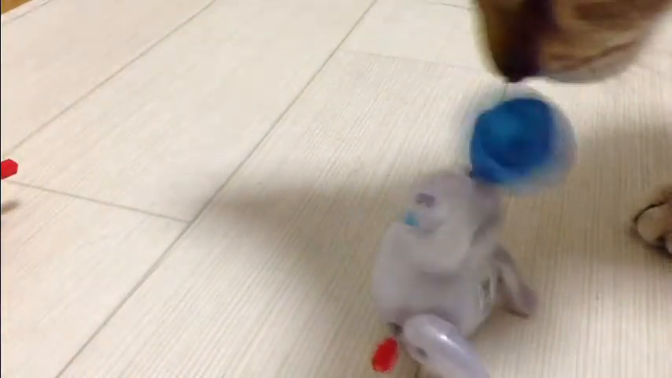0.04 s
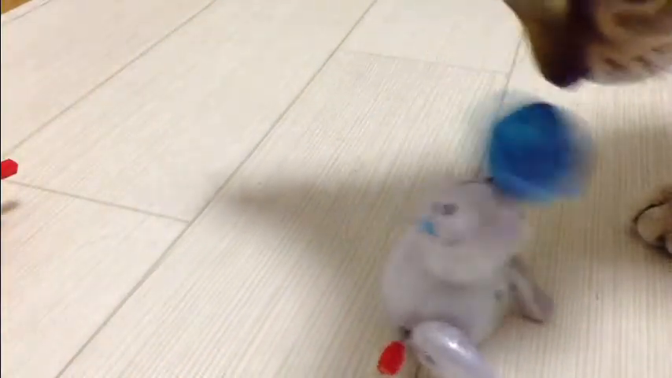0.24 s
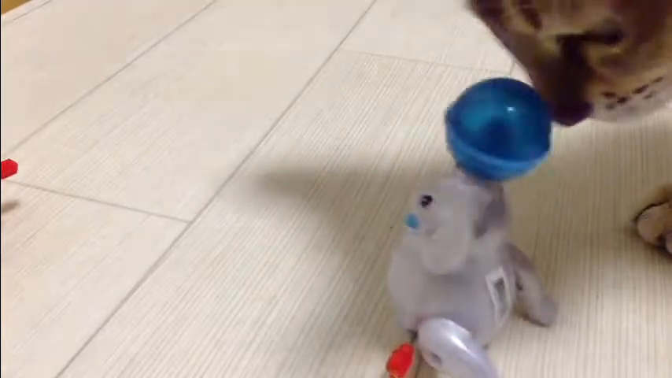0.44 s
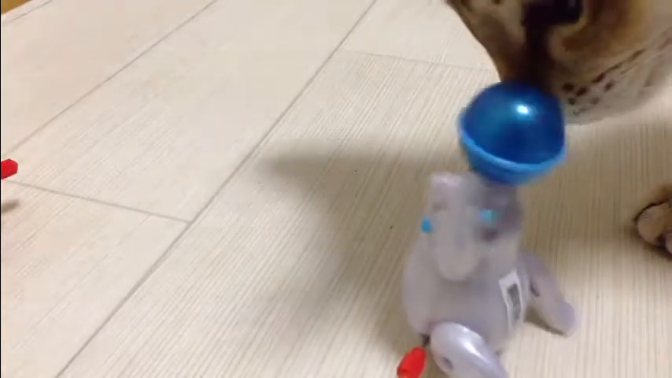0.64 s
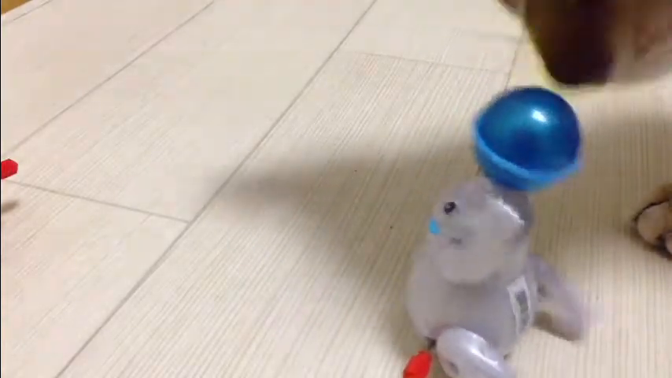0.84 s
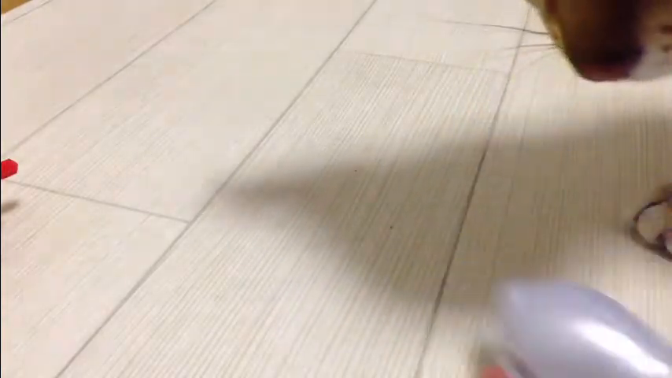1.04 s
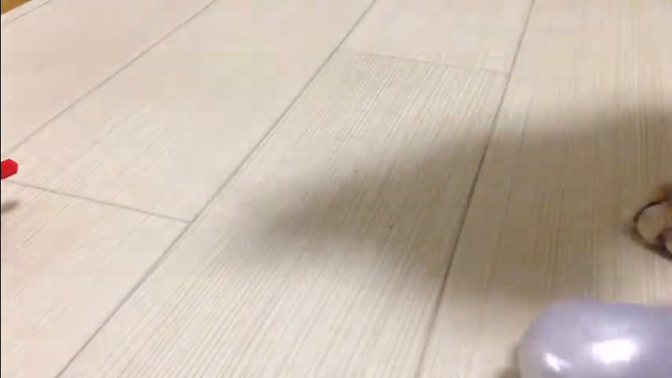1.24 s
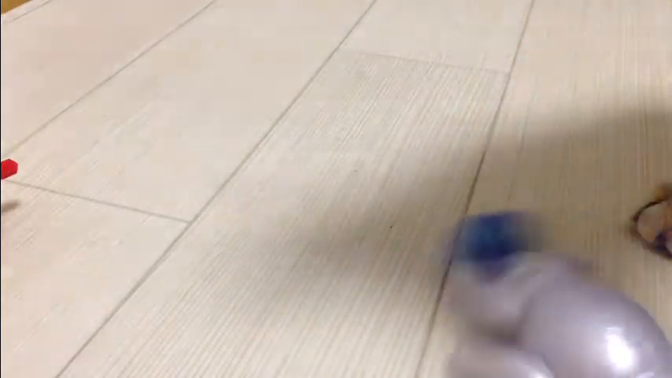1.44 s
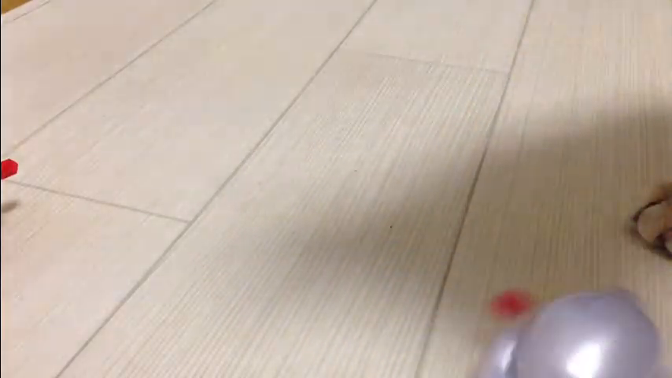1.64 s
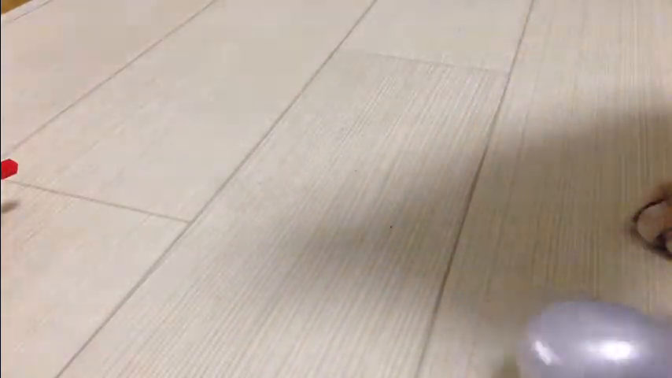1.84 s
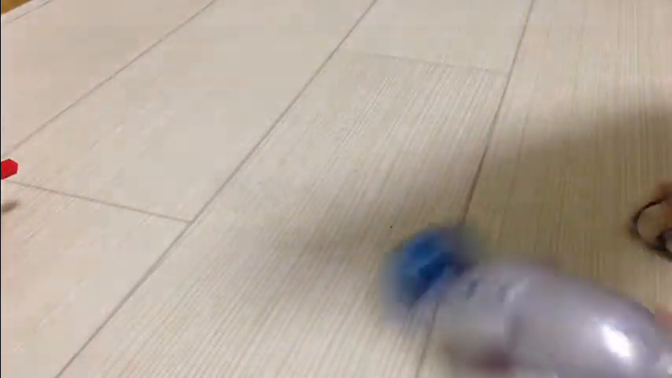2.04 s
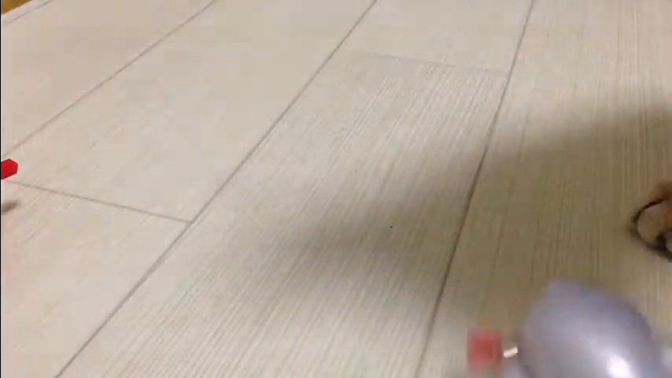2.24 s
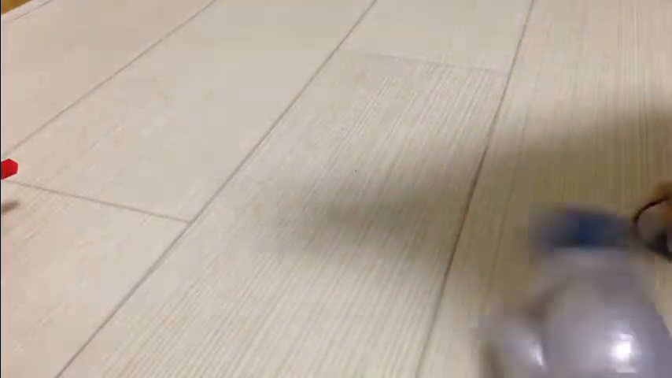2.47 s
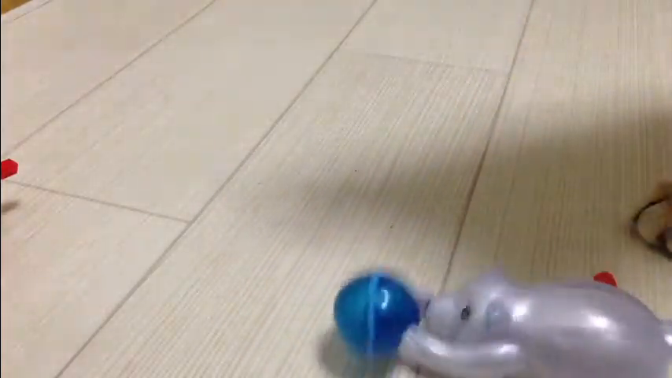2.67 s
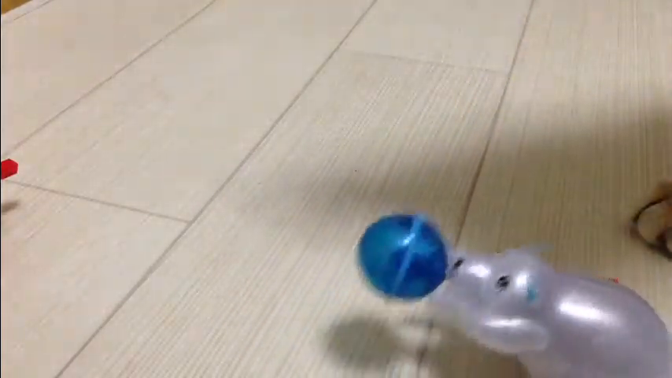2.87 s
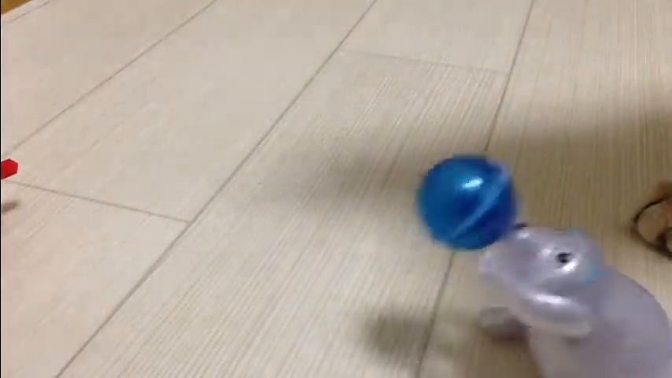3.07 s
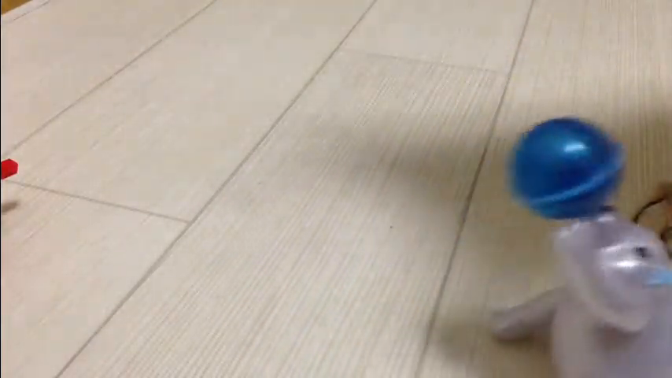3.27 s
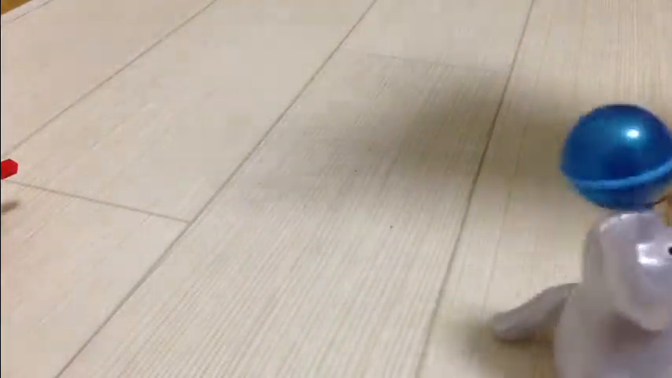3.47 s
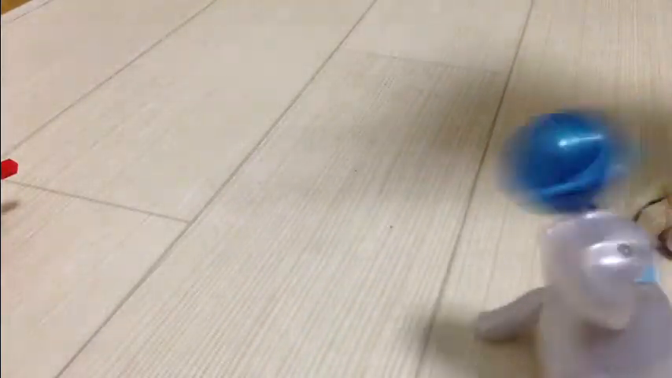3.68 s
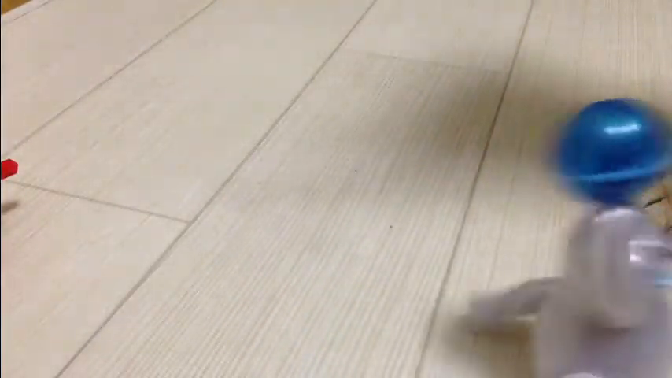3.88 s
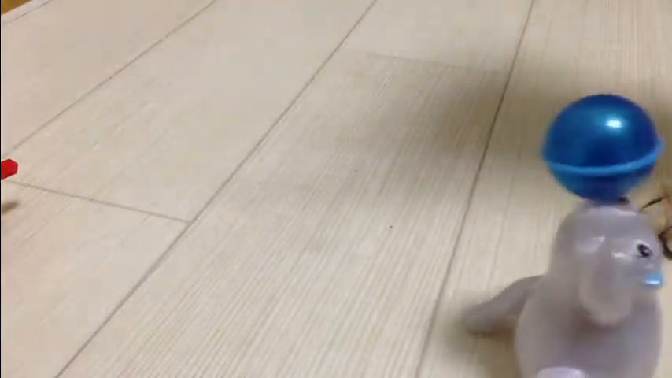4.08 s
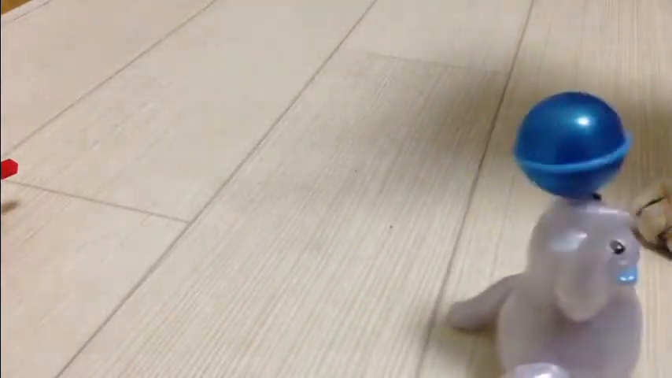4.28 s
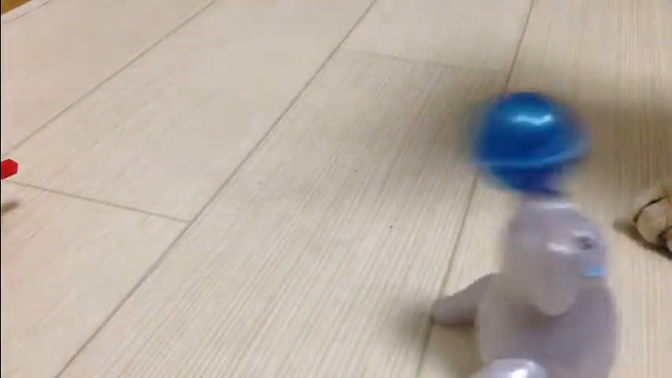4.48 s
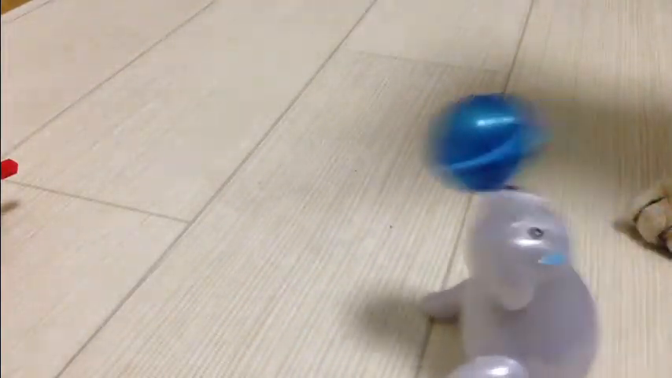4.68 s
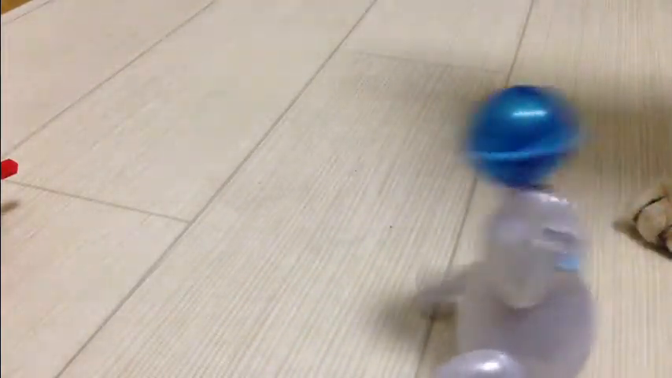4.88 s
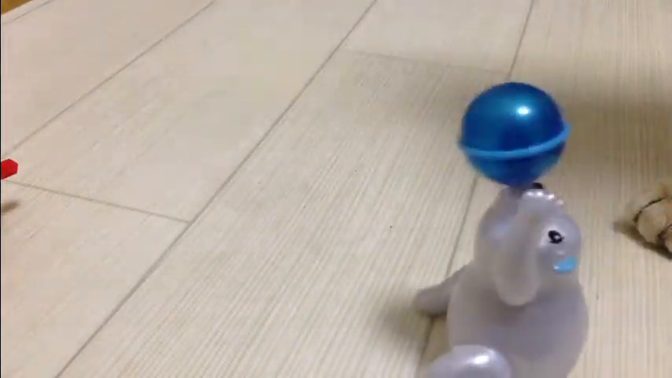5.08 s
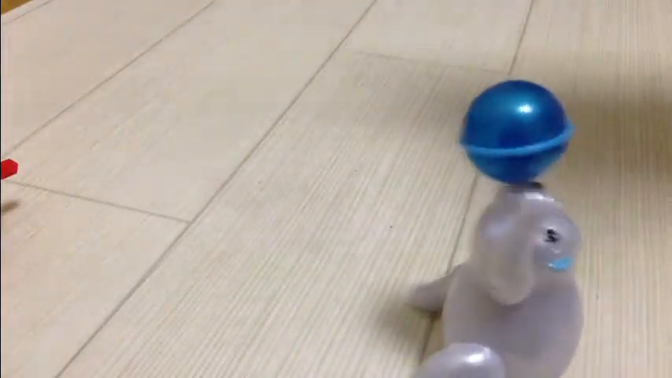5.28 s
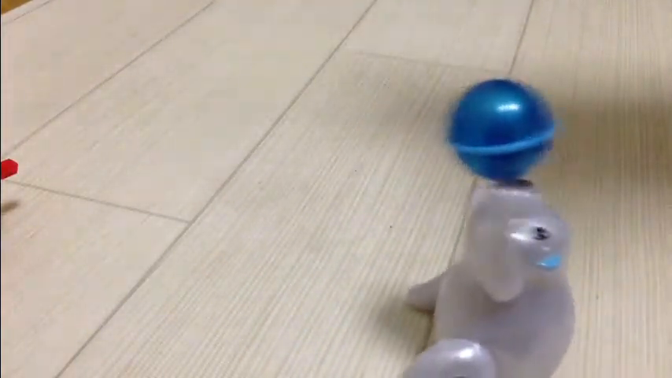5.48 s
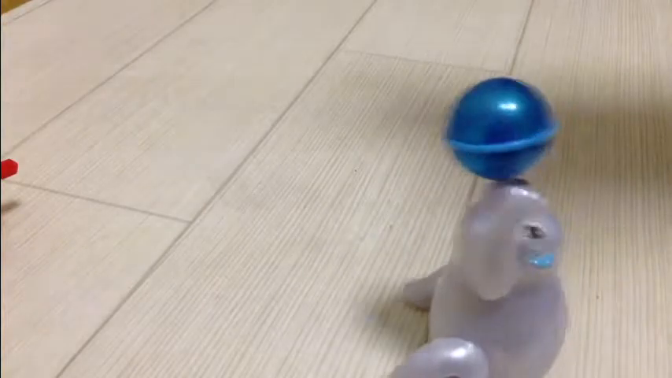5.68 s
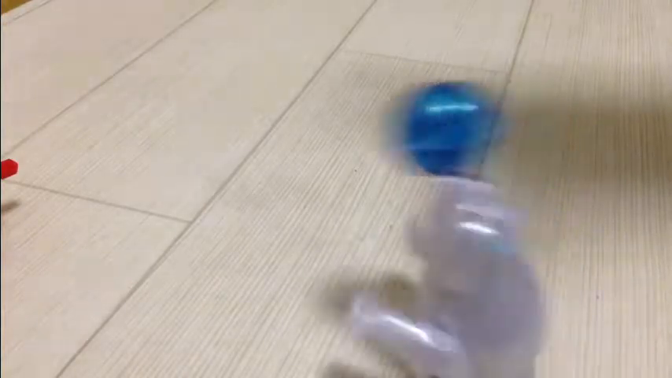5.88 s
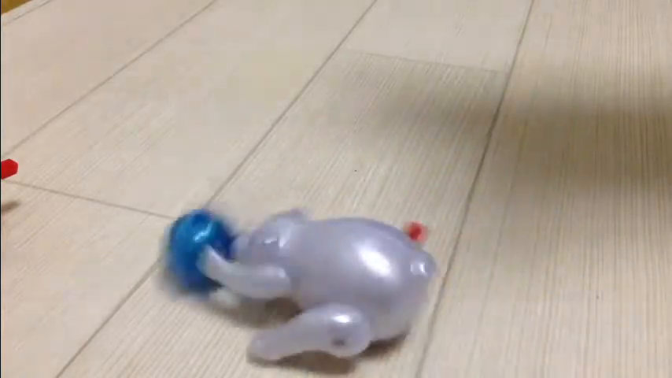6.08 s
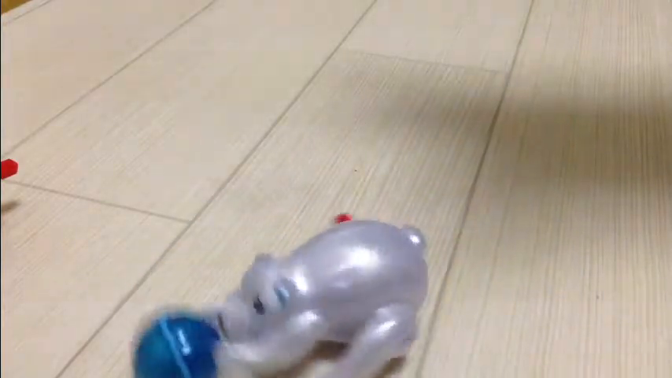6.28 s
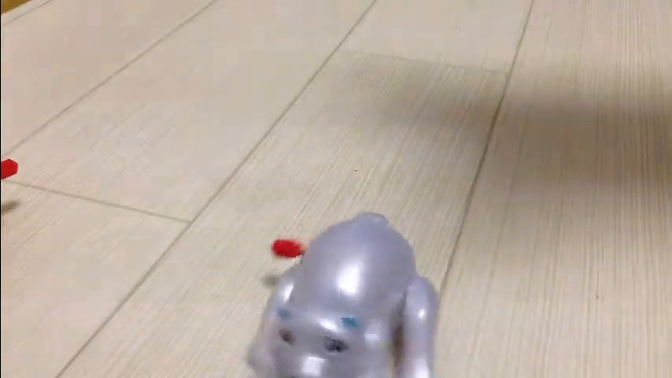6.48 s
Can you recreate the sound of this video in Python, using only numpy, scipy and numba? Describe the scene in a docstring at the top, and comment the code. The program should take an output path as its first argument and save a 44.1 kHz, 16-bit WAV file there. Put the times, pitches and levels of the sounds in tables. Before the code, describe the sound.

Close, buzzing clockwork of a small plastic toy, with light taps and clicks on floorboards and two clattering falls.

```python
"""A chattering whir: a plastic wind-up seal, ball on its nose, crosses a hard floor in a small room.
Gear teeth ring its hollow shell and body; feet tap the boards and joints click over their cams.
It topples, nearly stalls, thrashes on its side, rights itself, shuffles on and falls again,
leaving the clockwork ticking slowly. Close, mono."""
import sys
import numpy as np
from scipy import signal
from scipy.fft import rfft, irfft, next_fast_len
from scipy.io import wavfile
from scipy.ndimage import uniform_filter1d, minimum_filter1d
from numba import njit

SR = 44100
rng = np.random.default_rng(int(sys.argv[2]) if len(sys.argv) > 2 else 0)


def wrap_up_sound(samples):
    """Save the sound to the file named by the first command line argument, as 16-bit audio."""
    columns = np.atleast_2d(samples).T
    # keep every value between -1 and 1, then stretch to whole-number steps
    tamed = np.clip(columns, -1, 1)
    steps = np.round(tamed * 32767).astype(np.int16)
    wavfile.write(sys.argv[1], SR, steps)


N = 287532
TIME = np.arange(N) / SR
TOP_HZ = 15350


def undb(db):
    """dB to gain."""
    return 10 ** (np.asarray(db) / 20)


def unit(x):
    """Scale to rms 1."""
    return x / np.sqrt(np.mean(x ** 2))


def wander(rate_hz):
    """Random values joined by lines, rms 1."""
    return unit(np.interp(TIME * rate_hz, np.arange(8192), rng.standard_normal(8192)))


def add(out, start_s, sound):
    """Mix sound into out."""
    start = max(int(start_s * SR), 0)
    out[start:start + len(sound)] += sound[:N - start]


def lowpass(x, cutoff_hz):
    """Smooth zero-phase low-pass."""
    size = next_fast_len(len(x) + 1024)
    hz = np.fft.rfftfreq(size, 1 / SR)
    return irfft(rfft(x, size) / (1 + (hz / cutoff_hz) ** 6), size)[:len(x)]


def ring(x, spectrum, size=2048):
    """Minimum-phase resonator of unit energy; spectrum (f/Hz, level/dB) sets its shape only."""
    hz, db = np.transpose(sorted(spectrum))
    grid_hz = np.maximum(np.fft.rfftfreq(size, 1 / SR), 1)
    magnitude = undb(np.interp(np.log(grid_hz), np.log(hz), db))
    cepstrum = irfft(np.log(magnitude))
    cepstrum[1:size // 2] *= 2
    cepstrum[size // 2 + 1:] = 0
    response = irfft(np.exp(rfft(cepstrum)))
    return signal.fftconvolve(x, response / np.linalg.norm(response))[:len(x)]


@njit
def resonate(x, hz, width_hz):
    """State-variable band-pass, gain 1 at its moving centre."""
    out, band_state, low_state = np.empty(len(x)), 0., 0.
    for i in range(len(x)):
        g, damping = np.tan(np.pi * hz[i] / SR), width_hz / hz[i]
        passed = (band_state + g * (x[i] - low_state)) / (1 + g * (g + damping))
        band_state = 2 * passed - band_state
        low_state += 2 * g * passed
        out[i] = damping * passed
    return out


def band(x, hz, width_hz):
    """Two band-passes in series, rms 1."""
    centre_hz, width_hz = hz * np.ones(len(x)), float(width_hz)
    return unit(resonate(resonate(x, centre_hz, width_hz), centre_hz, width_hz))


# Background spectrum: f/Hz, level/dB
AIR_SPECTRUM = [(20, -63), (45, -30), (80, -11.5), (160, 1), (300, -3.5), (700, -0.5), (2000, -9.5),
                (15000, -15)]
def room_tone():
    """Faint, low hush of the room."""
    return undb(-77) * ring(rng.standard_normal(N), AIR_SPECTRUM)


def room(x, t60_s, wet_db, damp_hz):
    """Direct sound plus duller, diffuse wall reflections."""
    t = TIME[:SR // 2]
    tail = lowpass(rng.standard_normal(len(t)), damp_hz)
    tail *= np.exp(-np.log(1000) * t / t60_s) * (1 - np.exp(-t / 0.00099))
    return x + undb(wet_db) * signal.fftconvolve(x, tail / np.linalg.norm(tail))[:N]


def stray(hz, share=.012, rate_hz=12):
    """A mode's pitch shifts as the floor contact moves."""
    return hz * (1 + share * wander(rate_hz))


def swell(depth_db=3, rate_hz=24):
    """A mode's gain comes and goes as the toy wobbles, rms 1."""
    return unit(undb(depth_db * wander(rate_hz)))


# Body cavity modes: f/Hz, width/Hz, level/dB
HOLLOW_MODES = [(637, 45, -11), (1175, 79, -9.5), (1356, 31, -7), (2250, 59, 2.5)]
def hollow(force):
    """Narrow rings of the hollow body."""
    force = force + 1e-18  # avoids denormals
    return sum(undb(db) * swell() * resonate(force, stray(hz), float(width_hz))
               for hz, width_hz, db in HOLLOW_MODES)


def blow(clatter_s, clatter_db, rattle_s, rattle_db, size=4000):
    """One contact of unit energy: sharp push, quick rebounds, loose parts rattling out."""
    t = TIME[:size]
    rebounds, rattle = rng.standard_normal((2, size))
    force = undb(clatter_db) * rebounds * np.exp(-t / clatter_s)
    force += undb(rattle_db) * rattle * np.exp(-t / rattle_s)
    force[0] += 1
    return force / np.linalg.norm(force)


# Joint clicks: t/s, relative level/dB
JOINT_SNAPS = [(0.33, -20), (0.4785, -15.5), (3.231, -22.5), (4.6745, -19), (5.045, -18.5), (5.096, -13.5),
               (5.18, -18.5), (5.2895, -22), (5.5115, -19.5), (5.564, -17.5), (5.608, -31), (5.7731, -18.5),
               (6.247, -39), (6.272, -37)]
# Joint response: f/Hz, level/dB
JOINT_SPECTRUM = [(200, -44), (900, -14.5), (1400, -10.5), (2300, -10), (3200, -7), (5000, 2.5),
                  (6300, 4.5), (7800, -5.5), (11000, 2), (15000, -9)]
def snaps():
    """Limb joints slip over their cams with a small bright click."""
    out = np.zeros(N)
    for start_s, db in JOINT_SNAPS:
        force = blow(clatter_s=.0024, clatter_db=-3, rattle_s=.0067, rattle_db=-22)
        add(out, start_s, undb(db + 11.5) * ring(force, JOINT_SPECTRUM))
    return out


# Struck plastic: f/Hz, level/dB
PLASTIC_SPECTRUM = [(60, -83), (250, -43), (500, -29), (900, -16.5), (1350, -6.5), (1800, -7), (2500, -1),
                    (3500, -4), (5200, 1.5), (6300, 6), (7700, -3.5), (9000, -0.5), (11500, -2),
                    (15000, -7.5)]
def plastic(force):
    """Bright clack of plastic on the floor."""
    return ring(force, PLASTIC_SPECTRUM)


# Feet and limbs landing: t/s, relative level/dB, hard edge/dB, clatter/dB
FOOTFALLS = [(0.098, -17.5, -20, -30), (0.113, -26, -10, -24), (0.171, -25.5, -10, -16),
             (0.296, -21.5, -14, -24), (0.313, -20.5, -12, -26), (0.479, -23, -17, -16),
             (0.570, -23.5, -8, -31), (0.579, -24, -8, -27), (0.677, -23, -14, -20), (0.866, -19, -23, -35),
             (1.099, -14, -14, -28), (1.146, -14, -20, -33), (1.333, -35.5, -4, -14), (3.758, -23, -8, -11),
             (3.85, -27, -16, -22), (3.982, -29, -3, -19), (4.010, -22.5, -9, -11), (4.025, -25, -1, -16),
             (4.097, -23, -2, -9), (4.235, -23.5, -8, -14), (4.486, -27, -10, -20),
             (4.503, -23.5, -10, -18), (4.757, -22.5, -16, -21), (4.983, -26, -11, -10),
             (5.002, -25, -9, -24), (5.02, -27, -9, -16), (5.2596, -20.5, -14, -30), (5.4043, -19, -2, -25),
             (5.532, -18.5, -2, -26), (5.6647, -19.5, 1, -21), (5.797, -20, 1, -21),
             (6.079, -17.5, -18, -21), (6.475, -43.5, -14, -10)]
# Foot on wood: f/Hz, level/dB
FOOT_SPECTRUM = [(30, -72), (100, -38), (250, -21.5), (450, -13.5), (620, -2.5), (1300, 2), (2200, 10),
                 (3200, 7.5), (5000, 4.5), (15000, -62)]
def steps():
    """Feet rock down on the boards: woody tap, plastic edge, hollow ring."""
    taps, edges = np.zeros((2, N))
    for start_s, db, edge_db, clatter_db in FOOTFALLS:
        force = undb(db + 11.5) * blow(.0025, clatter_db, rattle_s=.009, rattle_db=-26.5)
        add(taps, start_s, force)
        add(edges, start_s, undb(edge_db) * force)
    return ring(taps, FOOT_SPECTRUM) + plastic(edges) + undb(-9) * hollow(taps)


# Shell and ball landing: t/s, relative level/dB, clatter decay/s, thump/dB
IMPACTS = [(1.102, -13.5, 0.0011, -70.5), (1.1441, -9.5, 0.0018, -25), (1.1464, -10, 0.0017, -35),
           (1.197, -24.5, 0.015, -52), (1.219, -33, 0.0022, -54), (6.079, -12, 0.0012, -66),
           (6.1185, -8.5, 0.0015, -24.5), (6.1225, -18, 0.0024, -44), (6.139, -23, 0.001, -52),
           (6.145, -25, 0.00079, -52), (6.182, -26.5, 0.0025, -25), (6.1847, -22, 0.0075, -49),
           (6.194, -28, 0.0014, -56)]
# Floorboard response: f/Hz, level/dB
BOARD_SPECTRUM = [(15, -12), (60, -5), (150, -4.5), (220, 0), (350, -2), (520, 2), (900, -5), (3000, -22.5)]
def falls():
    """The toy topples and bounces: the shell clacks and rings, the weight thumps the boards."""
    clacks, thumps = np.zeros((2, N))
    for start_s, db, clatter_s, thump_db in IMPACTS:
        gain = undb(db + 16) * np.sqrt(clatter_s / .0016)  # longer clatter, more energy
        clack = blow(clatter_s, clatter_db=1, rattle_s=.01, rattle_db=-23)
        thump = blow(clatter_s=.0014, clatter_db=-50, rattle_s=.008, rattle_db=-37)
        add(clacks, start_s, gain * clack)
        add(thumps, start_s, gain * undb(thump_db) * thump)
    return plastic(clacks) + undb(-5.5) * hollow(clacks) + undb(-1.5) * ring(thumps, BOARD_SPECTRUM)


# Orientation: t/s, side heard, relative level/dB, tooth sharpness/dB, body contact/dB
ORIENTATIONS = [(0, "back", -0.8, 3.5, -9), (1.229, "face down", -2, 2, -12.5),
                (1.51, "flank", -2.5, 2.5, -10.5), (2.681, "lying", -2, 2, -12),
                (3.36, "front", -0.48, 2.5, -11), (5.08, "half front", -1.83, 3.5, -10.5),
                (6.15, "face down", 0.6, 2, -12)]
def posture():
    """Held poses with 50 ms crossfades: each side's share, and the three dB curves."""
    current = np.searchsorted([pose[0] for pose in ORIENTATIONS[1:]], TIME)
    facing, tone_db = {}, 0
    for k, (_, side, *pose_db) in enumerate(ORIENTATIONS):
        share = uniform_filter1d(1. * (current == k), SR // 20)
        facing[side] = facing.get(side, 0) + share
        tone_db = tone_db + np.outer(pose_db, share)
    return facing, tone_db


def rocking(flank, period_s=.542, head_up_s=1.486):
    """Swing on the flank: head height and nearness to a turning point, each -1 to 1."""
    angle = 2 * np.pi * (TIME - head_up_s) / period_s
    return flank * np.cos(angle), flank * np.cos(2 * angle)


# Limb strokes: t/s, swell/dB, slack/dB
STROKES = [(0.095, 4.5, 1.5), (0.289, 1.68, 2.5), (0.471, 0.47, 2.05), (0.575, 2.5, 2.5), (0.768, 1.3, 1),
           (1.131, 4, 2), (1.547, 1, 1.5), (1.9, 2, 0.5), (2.229, 1, 0.5), (2.428, 1.5, 2), (2.87, 2, 0.5),
           (2.96, 2, 1), (3.088, 1.84, 10.5), (3.21, 1, 1.5), (3.479, 3, 1.5), (3.765, 3, 1.5),
           (4.013, 3.5, 0.5), (4.245, 5, 2), (4.439, 3, 0), (4.512, 1, 4.5), (4.776, 2.5, 3.5),
           (5.005, 3.5, 4), (5.26, 0, 2), (5.411, 1.3, 1), (5.665, 2, 2), (5.8, 1, 2.5), (6.086, 2, 10),
           (6.5, -2, 1)]
def strides(bear_down_s=.12, release_s=.072, recover_s=.035):
    """Gear load in dB: each stroke bears down, goes slack as the weight tips over, then recovers."""
    shape_s = np.array([-bear_down_s, 0, release_s, release_s + recover_s])
    return sum(np.interp(TIME, at_s + shape_s, [0, swell_db, -slack_db, 0])
               for at_s, swell_db, slack_db in STROKES)


def grit(spread_db=.5):
    """Tiny uneven collisions of dry plastic, rms 1."""
    return unit(rng.standard_normal(N) * undb(spread_db * rng.standard_normal(N)))


# Body and boards, by pose: f/Hz, level/dB
BODY_UPRIGHT = [(120, -65.5), (200, -34), (274, -63.5), (500, -36), (610, -11.5), (740, -14.5),
                (1170, -3.5), (1340, -3), (1640, -4), (2250, 4.5), (2660, -1.5), (2900, -3), (3600, -6.5),
                (4680, -28), (7920, -120)]
BODY_ON_FLANK = [(180, -58), (300, -41), (450, -27), (560, -28), (634, -21), (718, -25.5), (992, -12),
                 (1150, -6.5), (1780, -6), (2430, -0.5), (3140, -6.5), (3600, -4), (4680, -32),
                 (7920, -120)]
BODY_LYING_DOWN = [(240, -62), (400, -37), (650, -30), (850, -19.5), (1100, -11), (1530, -9), (1790, -6),
                   (2470, -3.5), (3020, -9), (3600, -8), (4680, -36), (7920, -120)]
BODY_FACE_DOWN = [(300, -58), (700, -28), (1000, -15.5), (1450, -6), (1700, -11), (2050, -7), (2400, -3.5),
                  (2700, -6), (3000, -10), (3700, -9), (4680, -29), (7920, -120)]
def body_chatter(force, facing, standing):
    """The body chatters loosely on the floor and rings most freely when upright."""
    knocks = force * grit() * undb(1.5 * wander(120))
    upright = ring(knocks, BODY_UPRIGHT) + undb(-11) * unit(hollow(knocks))
    return (standing * upright
            + facing["flank"] * ring(knocks, BODY_ON_FLANK)
            + facing["lying"] * ring(knocks, BODY_LYING_DOWN)
            + facing["face down"] * ring(knocks, BODY_FACE_DOWN))


# Shell rubbing the floor: t/s, length/s, f/Hz, width/Hz, relative level/dB
SHELL_SKIDS = [(1.065, 0.092, 6600, 900, 2.5), (1.377, 0.11, 11800, 1000, -1),
               (1.734, 0.12, 5170, 850, -1.5), (1.788, 0.13, 680, 329.6, -25.5),
               (1.95, 0.2, 4900, 1000, -10), (2.15, 0.12, 560, 397, -33), (2.2, 0.063, 6940, 1200, -7),
               (2.27, 0.12, 5300, 1000, -4), (2.34, 0.12, 610, 400, -28.5), (2.37, 0.075, 6740, 1500, -3),
               (2.51, 0.089, 11800, 1300, -1), (2.655, 0.06, 619, 500, -26), (4.09, 0.12, 6050, 350, -6),
               (4.254, 0.041, 7140, 500, -7), (5.959, 0.071, 10060, 1094, 0), (6.075, 0.044, 6400, 910, 2),
               (6.4, 0.15, 5400, 650, -1.5)]
def skids(buzz):
    """The buzzing shell sings briefly where its edge slides on the floor."""
    out = np.zeros(N)
    for start_s, length_s, hz, width_hz, db in SHELL_SKIDS:
        part = buzz[int(start_s * SR):int((start_s + length_s) * SR)]
        fade = signal.windows.tukey(len(part), .4)
        add(out, start_s, undb(db) * band(part, hz, width_hz) * fade)
    return out


# Shell modes: side, f/Hz, width/Hz, relative level/dB, head-up gain/dB, turning-point gain/dB
SIDE_MODES = [("back", 5870, 620, -10, 0, 0), ("back", 9030, 300, -14.5, 0, 0),
              ("back", 10200, 300, -19, 0, 0), ("back", 12310, 500, -18, 0, 0),
              ("flank", 5050, 750, -8, -1.2, 1.5), ("flank", 6930, 1000, -9, -3, 0),
              ("flank", 11600, 780, -12, 1, 1), ("lying", 7050, 600, -9, 0, 0),
              ("lying", 4950, 350, -13, 0, 0), ("front", 625, 65, -33, 0, 0),
              ("front", 5340, 220, -13.5, 0, 0), ("front", 6040, 300, -9.5, 0, 0),
              ("front", 11360, 450, -14, 0, 0), ("half front", 5330, 350, -8.5, 0, 0),
              ("half front", 11480, 590, -7.5, 0, 0), ("face down", 4950, 600, -8, 0, 0),
              ("face down", 9900, 500, -11, 0, 0)]
def shell_rings(buzz, facing):
    """Single modes stand out while their side faces the listener, and trade places as the toy rocks."""
    head, turning = rocking(facing["flank"])
    out = np.zeros(N)
    for side, hz, width_hz, db, head_db, turn_db in SIDE_MODES:
        gain = facing[side] * swell() * undb(db + head_db * head + turn_db * turning)
        out += gain * band(buzz, stray(hz), width_hz)
    return out


def linger(x, mean_s=.0011, step_hz=130):
    """Strikes bounce inside the shell: each frequency leaves after its own short delay."""
    size = next_fast_len(len(x) + 2048)
    hz = np.fft.rfftfreq(size, 1 / SR)
    delay_s = mean_s * np.interp(hz / step_hz, np.arange(256), rng.exponential(size=256))
    lag_cycles = np.cumsum(delay_s) * SR / size
    return irfft(rfft(x, size) * np.exp(-2j * np.pi * lag_cycles), size)[:len(x)]


# Shell response, by side heard: f/Hz, level/dB
BACK_SPECTRUM = [(1760, -47), (3000, -16), (3250, -9.5), (3530, -7.5), (4990, -2.5), (5800, -0.5),
                 (6820, -4), (7810, -3.5), (8890, -2), (9510, -4.5), (10000, -0.5), (10800, -2.5),
                 (12300, 0.5), (13800, -3.5), (15200, -7.5)]
FRONT_SPECTRUM = [(1760, -39.5), (3000, -19), (3390, -17.5), (3910, -4), (4240, -5), (4960, 2.5),
                  (5490, -0.5), (5960, 3.5), (6590, -2), (7870, -2.5), (9070, -2.5), (11400, 2),
                  (13500, -2.5), (14700, -6), (15200, -4.5)]
FLANK_SPECTRUM = [(1760, -38.5), (3000, -23), (3150, -15.5), (3940, -2.5), (4400, -1), (5270, 0),
                  (5920, -1.5), (6870, -0.5), (8360, -2.5), (10300, -2.5), (11200, 1), (11900, 0.5),
                  (15200, -8)]
LYING_SPECTRUM = [(1760, -44), (3000, -50), (3120, -33), (3750, -3.5), (4100, -2), (4990, 0), (6120, -1.5),
                  (7110, 3), (8310, -5), (8890, -4.5), (9390, -4.5), (10300, -0.5), (11900, 0),
                  (13500, -3.5), (15200, -10.5)]
FACE_DOWN_SPECTRUM = [(1760, -49), (3100, -14), (4000, -8.5), (4400, -2), (5200, -2.5), (6000, -5),
                      (7300, -3), (8700, -4.5), (10800, -3.5), (11800, -0.5), (12600, -5), (15200, -7.5)]
def shell_whir(force, facing, sharp_db):
    """Teeth ring the shell directly; sharper contacts lift the treble."""
    strikes = linger(force * grit(spread_db=.3))
    shell = (facing["back"] * ring(strikes, BACK_SPECTRUM)
             + (facing["front"] + facing["half front"]) * ring(strikes, FRONT_SPECTRUM)
             + facing["flank"] * ring(strikes, FLANK_SPECTRUM)
             + facing["lying"] * ring(strikes, LYING_SPECTRUM)
             + facing["face down"] * ring(strikes, FACE_DOWN_SPECTRUM))
    buzz = force * grit()
    shell += undb(-5) * (shell_rings(buzz, facing) + skids(buzz))
    soft = lowpass(shell, 7100)
    return undb(2) * soft + undb(sharp_db + 3) * (shell - soft)


def gear_teeth(tooth_hz, standing, flank, chatter_s=.001, slide=.48):
    """Contact force: each tooth lands with its own strength, chatters, then slides until the next."""
    # Backlash: teeth land early or late, more so under the uneven load of walking.
    backlash_s = (.0002 + .0003 * standing) * wander(420)
    uneven_hz = tooth_hz * (1 + (.015 + .05 * standing) * wander(40))
    phase = np.cumsum(uneven_hz) / SR + tooth_hz * backlash_s
    load = 1 - .5 * flank  # limbs in the air: gears run more evenly
    axle_play = undb(.8 * load * wander(115))  # loose bearings
    tooth = np.floor(phase).astype(int)
    strength = undb(2.18 * load * rng.standard_normal(8192)[tooth % 8192])
    age_s = (phase - tooth) / tooth_hz
    return axle_play * unit(strength * np.exp(-age_s / chatter_s) + slide)


def shifting_colour(x, drift_db, drift_hz=16, flicker_db=1.5, flicker_hz=170, bands=26):
    """Bands flicker as each tooth excites the modes differently, and drift as the body turns."""
    size = next_fast_len(len(x))
    position = np.sqrt(np.fft.rfftfreq(size, 1 / SR) / TOP_HZ).clip(0, 1) * (bands - 1)
    spectrum, out = rfft(x, size), np.zeros(N)
    for k in range(bands):
        part = irfft(spectrum * np.maximum(1 - abs(position - k), 0), size)[:N]
        out += part * undb(flicker_db * wander(flicker_hz) + drift_db * wander(drift_hz))
    return out


# Clockwork speed before stroke modulation: t/s, tooth rate/Hz
TOOTH_RATE = [(0, 590), (0.25, 662), (1.135, 683.5), (1.168, 397.4), (1.215, 401), (1.255, 253.7),
              (1.305, 266.5), (1.385, 418.4), (1.55, 507), (1.72, 569), (2.08, 579.6), (2.36, 647),
              (2.655, 605), (2.705, 465), (2.79, 410), (2.98, 500.6), (3.45, 600), (5.9, 585), (6.11, 660),
              (6.24, 183.2), (6.52, 238.6)]
def clockwork(cruise_hz=590, db_per_doubling=11.5):
    """The gear train drives shell and body; faster teeth strike harder, strokes move speed and level."""
    speed_hz = np.interp(TIME, *np.transpose(TOOTH_RATE))
    stride_db = strides()
    facing, (pose_db, sharp_db, contact_db) = posture()
    standing = facing["back"] + facing["front"] + facing["half front"]
    force = gear_teeth(speed_hz * undb(.12 * stride_db), standing, facing["flank"])
    shell = undb(stride_db) * shell_whir(force, facing, sharp_db)
    # The resting body feels only part of each stroke and rubs most in mid-swing.
    _, turning = rocking(facing["flank"])
    body = undb(contact_db + .76 * stride_db - turning) * body_chatter(force, facing, standing)
    drive_db = -35.5 + db_per_doubling * np.log2(speed_hz / cruise_hz) + pose_db
    whir = undb(drive_db) * (shell + body)
    whir = shifting_colour(whir, drift_db=.6 * standing + 1.5 * (1 - standing))
    return whir - lowpass(whir, 157)  # too small to radiate bass


def scene():
    """The toy in a quiet room, both channels alike."""
    toy = clockwork() + steps() + snaps() + falls()
    mono = room(toy, t60_s=.25, wet_db=-17, damp_hz=8500) + room_tone()
    return np.tile(mono, (2, 1))


def record(dry):
    """Peak limiter, then a steep treble cut."""
    ceiling, window = .48, int(.002 * SR)
    needed_gain = ceiling / np.maximum(abs(dry), ceiling)
    gain = uniform_filter1d(minimum_filter1d(needed_gain, window), window)
    treble_cut = signal.ellip(10, .05, 60, TOP_HZ, fs=SR, output="sos")
    return signal.sosfiltfilt(treble_cut, gain * dry)


dry = scene()
out = record(dry)
wrap_up_sound(out)
```